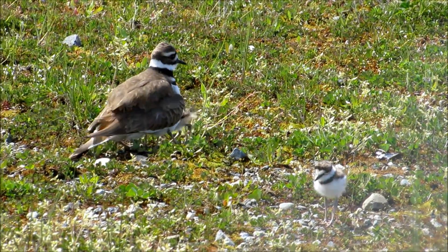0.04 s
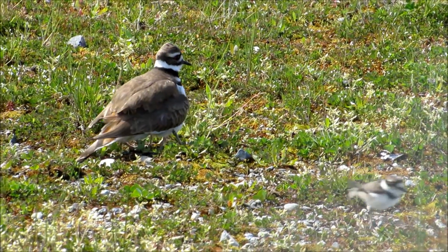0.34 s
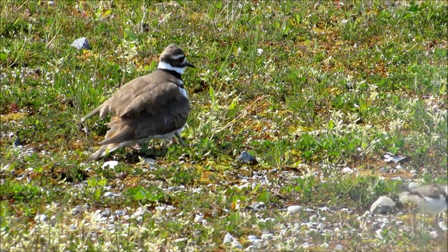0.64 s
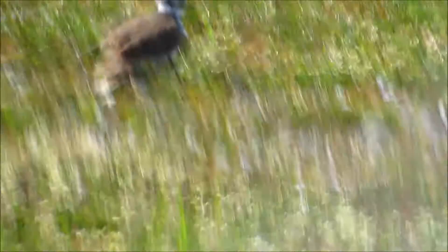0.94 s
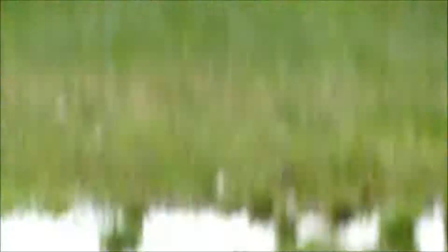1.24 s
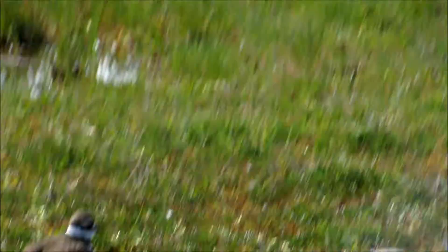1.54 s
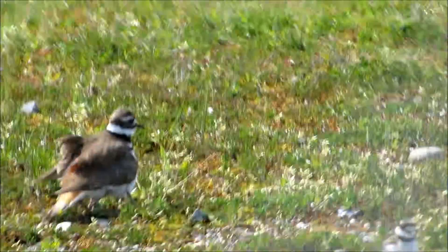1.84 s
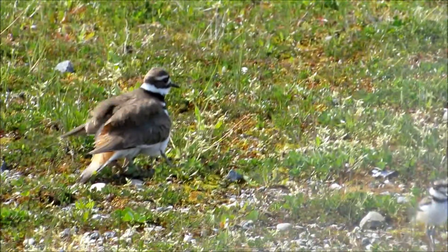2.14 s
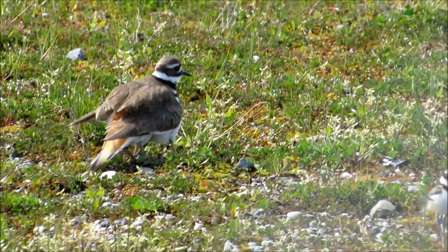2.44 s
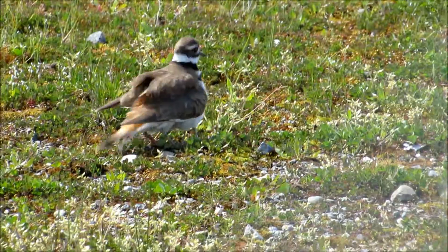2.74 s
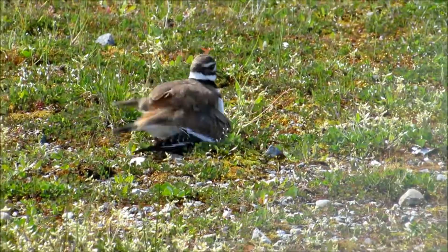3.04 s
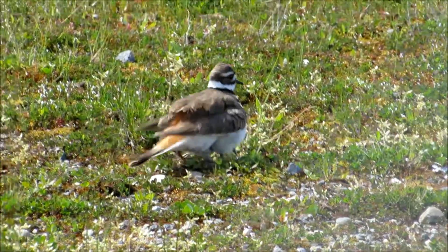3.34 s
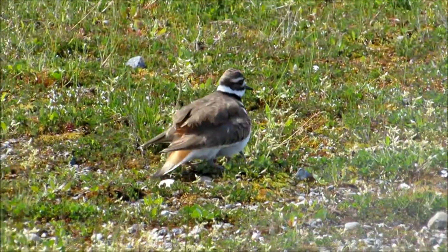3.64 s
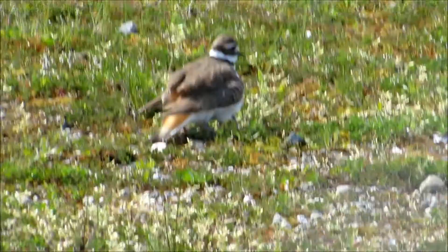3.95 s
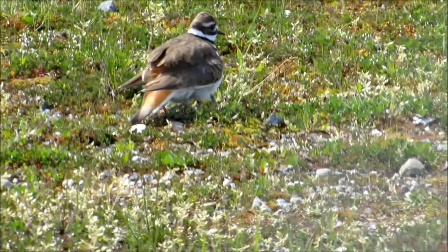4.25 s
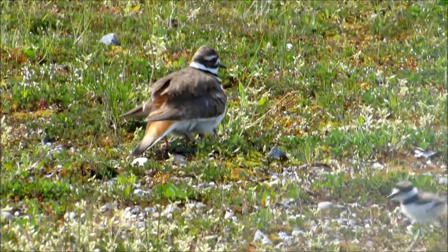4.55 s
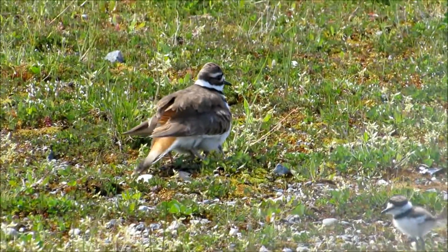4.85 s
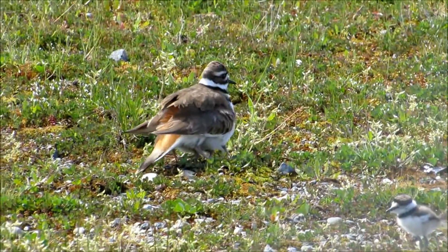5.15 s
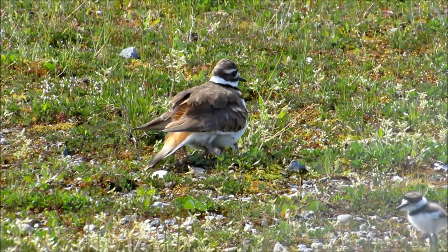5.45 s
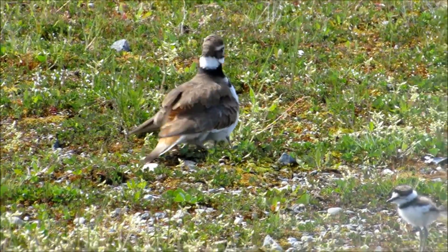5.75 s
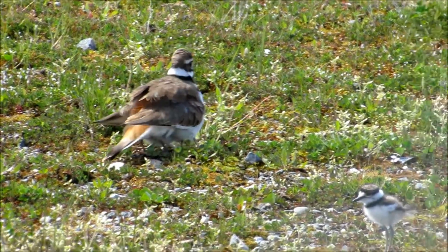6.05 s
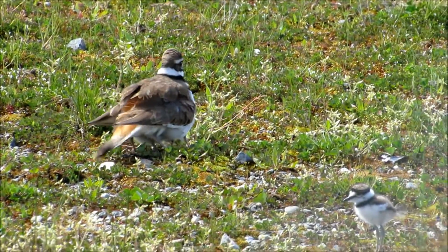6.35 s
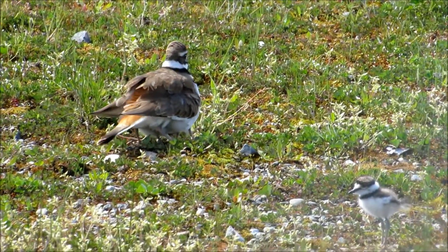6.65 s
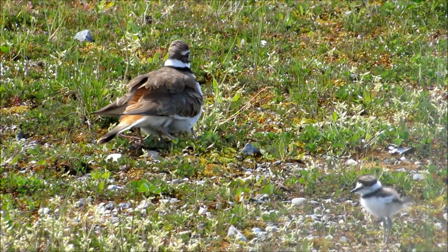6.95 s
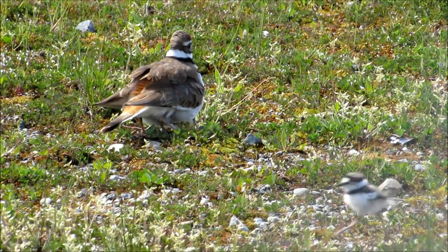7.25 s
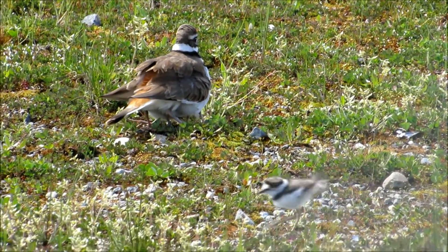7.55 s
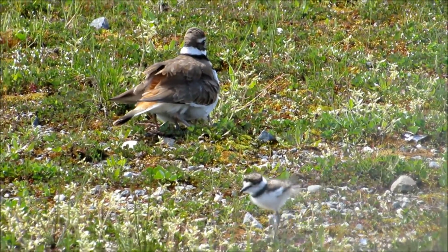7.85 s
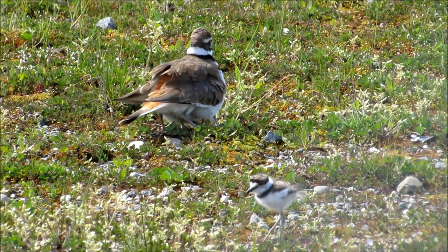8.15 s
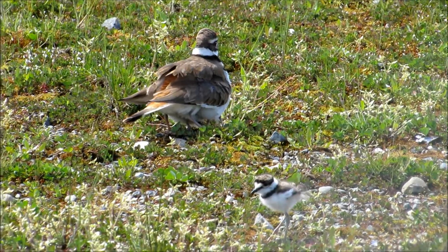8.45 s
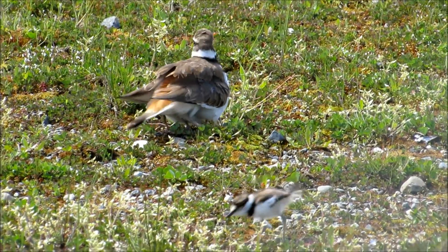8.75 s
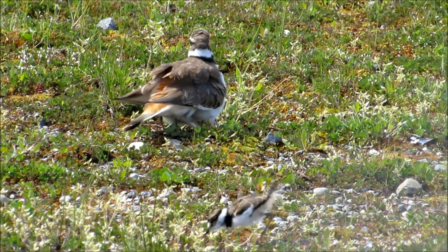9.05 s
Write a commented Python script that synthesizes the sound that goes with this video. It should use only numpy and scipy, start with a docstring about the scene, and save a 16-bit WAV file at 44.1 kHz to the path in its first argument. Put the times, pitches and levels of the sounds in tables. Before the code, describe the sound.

Gusty wind buffets a hand-held microphone in an open field for about nine seconds. Its low, fluttering rumble and irregular thumps are the loudest sound throughout, over a soft outdoor wash. From 0.7 to 1.8 seconds fingers rub the housing, with one soft, briefly ringing knock near 0.9. A bird chick gives six faint, short, high peeps, slightly to the left, at about 3.1, 4.0, 4.7, 5.5, 6.4 and 7.2 seconds. Each starts raspy and falls to a thin held whistle; the middle two are clearest. A very soft hiss swells to a peak near 4.7 seconds and fades by 6. The wind strengthens from about 4 seconds, with harder thumps, small pops and a sharp snap near 8.8. Barely audible distant birds chirp around 0.4, 2.4, 6 and 8 seconds.

```python
"""Killdeer chick in gusty wind.

A chick whistles raspy, falling peeps on open gravelly grass; the ground scatters a thin tail.
Gusts buffet the two ports of a hand-held microphone: turbulence rumbles, vortices thump and pop.
Early on, fingers rub the housing and knock its modes into ringing. Other small birds call far off
over an outdoor wash, and a soft hiss swells and fades."""
import sys
import numpy as np
from scipy import signal
from scipy.fft import rfft, irfft, next_fast_len
from scipy.io import wavfile

SR = 44100
rng = np.random.default_rng(int(sys.argv[2]) if len(sys.argv) > 2 else 0)


def file_out(sig):
    """Save sig as 16-bit WAV at sys.argv[1]."""
    # one column per channel
    cols = np.atleast_2d(sig).T
    # limit, then scale
    lim = np.clip(cols, -1, 1)
    pcm = np.round(lim * 32767).astype(np.int16)
    wavfile.write(sys.argv[1], SR, pcm)


N = 410571
TIME = np.arange(N) / SR


def from_db(db):
    """Decibels to gain."""
    return 10 ** (np.asarray(db) / 20)


def unit_rms(x):
    """Scale to rms 1."""
    return x / np.sqrt(np.mean(x ** 2) + 1e-20)


def curve(rows):
    """Interpolate (t/s, value) rows at every sample."""
    return np.interp(TIME, *np.transpose(rows))


def panned(pan_db):
    """Stereo gains, left over right by pan_db."""
    return from_db(np.array([[pan_db], [-pan_db]]) / 2)


def drift(rate_hz):
    """Random wander below rate_hz, rms 1."""
    hop, settle = 20, 2000
    pole = np.exp(-2 * np.pi * rate_hz * hop / SR)
    white = rng.standard_normal(N // hop + settle + 2)
    slow = signal.lfilter([1], [1, -2 * pole, pole * pole], white)[settle:]
    return np.interp(np.arange(N) / hop, np.arange(len(slow)), unit_rms(slow))


def noise(spectrum, tilt_db_oct=0, size=N):
    """Two independent shaped noises, rms 1, falling 24 dB/oct beyond the spectrum's ends."""
    hz, level_db = np.transpose(spectrum)
    padded = next_fast_len(size)
    octave = np.log2(np.maximum(np.fft.rfftfreq(padded, 1 / SR), 1))
    inside = np.clip(octave, np.log2(hz[0]), np.log2(hz[-1]))
    shape_db = np.interp(octave, np.log2(hz), level_db) + tilt_db_oct * inside - 24 * abs(octave - inside)
    white = rfft(rng.standard_normal((2, padded)))
    return unit_rms(irfft(white * from_db(shape_db), padded)[:, :size])


def low_pass(x, hz, order=2):
    """Butterworth low-pass."""
    return signal.sosfilt(signal.butter(order, hz, fs=SR, output="sos"), x)


def add(out, start_s, sound):
    """Mix a sound in from start_s."""
    at = max(round(start_s * SR), 0)
    out[..., at:at + sound.shape[-1]] += sound[..., :max(N - at, 0)]


# wash spectrum: f/Hz, relative density/dB
AIR_SPECTRUM = [(100, 6.5), (400, -1.5), (800, -3.5), (1400, -5), (2100, -17.5), (3450, -24.5), (4000, -33),
                (7000, -37.5)]
# wash swell: t/s, gain/dB
AIR_GAIN = [(0, -2), (1.4, 1), (3.5, 1.5), (5.5, 0.5), (9.3, -1.5)]


def outdoor_air(base_db=-66, correlation=0.29, pan_db=6):
    """A far wash, mostly from the left, slowly swells and fades."""
    mid, side = from_db(base_db) * noise(AIR_SPECTRUM)
    wash = np.sqrt(1 + correlation) * mid + np.sqrt(1 - correlation) * np.array([side, -side])
    return wash * panned(pan_db) * from_db(curve(AIR_GAIN))


# microphone noise floor: f/Hz, relative density/dB
FLOOR_SPECTRUM = [(1000, -33), (4500, 8.5), (7000, 0.5), (10000, 5), (12000, -5.5), (14000, -18)]


def self_noise(level_db=-92):
    """The microphone's own steady hiss."""
    return from_db(level_db) * noise(FLOOR_SPECTRUM)


# wind strength at the ports: t/s, level/dB
GUST_LEVEL = [(0, -42.5), (0.42, -38), (1.17, -42.5), (1.8, -34.5), (2.25, -39), (2.75, -40), (3.4, -40.5),
              (3.95, -34.5), (5.25, -35.5), (5.45, -33.5), (5.65, -34.5), (6.3, -34), (7.05, -38),
              (7.4, -37), (7.85, -36), (8.25, -36), (8.85, -35), (9.3, -37)]
# brief drops in the wind: t/s, depth/dB
GUST_LULLS = [(.14, 3), (1.0, 1), (2.72, 12.5), (6, 9.5), (7.0, 3.5), (7.63, 7), (8.02, 8)]


def gusts(lull_sigma_s=0.022):
    """Wind strength in dB: a gust every second or two, cut by short lulls."""
    lulls_db = sum(depth_db * np.exp(-.5 * ((TIME - s) / lull_sigma_s) ** 2) for s, depth_db in GUST_LULLS)
    return curve(GUST_LEVEL) - lulls_db


def random_eddies(gust_db, per_s=14, over_gust_db=7, scatter_db=4.5,
                  centre_hz=346, oct_per_db=-0.0239, scatter_oct=0.23):
    """Uneven eddies, harder and deeper in stronger gusts. Rows: t/s, level/dB, f/Hz."""
    late, strength, pitch = rng.uniform(-1, 1, (300, 3)).T
    s = (np.arange(len(late)) + 1 + late) / per_s
    local_db = np.interp(s, TIME, gust_db)
    peak_db = local_db + over_gust_db + scatter_db * strength
    hz = centre_hz * 2 ** (oct_per_db * (local_db - gust_db.mean()) + scatter_oct * pitch)
    return np.transpose([s, peak_db, hz])[s < TIME[-1]]


# wind rumble: f/Hz, relative density/dB
TURBULENCE_SPECTRUM = [(25, -3.5), (50, 2), (120, 3), (190, 3), (330, -1.5), (520, -9), (750, -18),
                       (1000, -27), (1400, -38), (1750, -46.5), (2300, -57.5), (3000, -63.5)]


def turbulence(gust_db, eddies, gain_db=-1.8, surge_share=0.35, rise_s=0.0035, fall_s=0.0085):
    """Rumble in each port: as the flow surges, small fast eddies grow most; each size sputters alone."""
    mean_db = gust_db.mean()
    flutter_db = 4 * np.minimum(drift(rate_hz=55), 1.5)
    lumps_db = 1.44 * np.minimum(drift(rate_hz=11), 1.5)
    flow_db = gust_db - mean_db + flutter_db + lumps_db
    for s, peak_db, _ in eddies:
        near = slice(max(round((s - .04) * SR), 0), round((s + .04) * SR))
        t = TIME[near] - s
        surge = np.exp(-.5 * (t / np.where(t < 0, rise_s, fall_s)) ** 2)
        crest_db = gust_db[near] + surge_share * (peak_db - gust_db[near])
        flow_db[near] += surge * (crest_db - mean_db - flow_db[near])
    rest, out = noise(TURBULENCE_SPECTRUM), 0
    for k, edge_hz in enumerate([90, 220, 500, 1100, 8000]):
        band = low_pass(low_pass(rest, edge_hz)[:, ::-1], edge_hz)[:, ::-1]  # zero phase
        rest = rest - band
        sensitivity = 0.4167 + 0.345 * k
        sputter_db = 3 * np.minimum(drift(rate_hz=70), 1.5)
        out = out + band * from_db(sensitivity * flow_db + sputter_db)
    return from_db(mean_db + gain_db) * out


def vortex(t, hz):
    """One pull and one push of height 1, with its energy around hz."""
    x = np.pi * hz * t
    swing = x / (1 + x ** 2) ** 3
    return swing / swing.max()


def buffets(eddies, gain_db=-4, flank_db=-7, spacing_s=0.003602):
    """A vortex passes the windward port, with a weaker one just ahead and another behind."""
    out, t = np.zeros(N), np.arange(-SR // 50, SR // 50) / SR
    for (s, peak_db, hz), draws in zip(eddies, rng.uniform(-0.933, 1, (len(eddies), 3, 3))):
        for place, (polarity, late, pitch) in zip((-1, 0, 1), draws):
            delay_s = place * spacing_s * (1 + late / 2)
            swing = np.sign(polarity) * vortex(t - delay_s, hz * 10 ** (0.15 * pitch * place))
            add(out, s + t[0], from_db(peak_db + gain_db + flank_db * abs(place)) * swing)
    return out


# hardest eddies at the port: t/s, level/dB, centre f/Hz
HARD_EDDIES = [(0.084, -23.5, 225), (.271, -28, 280), (0.334, -31, 364), (0.379, -22, 240),
               (.405, -28.5, 333), (.454, -27, 265), (0.506, -25, 340), (.54, -26.5, 308),
               (0.691, -23, 260), (.885, -25.5, 380), (1.058, -24, 317), (1.25, -22.5, 210),
               (1.533, -22.5, 258), (1.555, -31, 278), (1.601, -25, 360), (1.699, -18, 380),
               (1.79, -24.5, 304), (1.963, -22, 363), (1.994, -24.5, 337), (2.34, -22, 298),
               (2.448, -18.5, 410), (2.463, -17.5, 432), (2.531, -25, 408), (2.587, -22, 368),
               (2.645, -18.5, 262), (2.807, -20.5, 348), (2.854, -27.5, 289), (3.094, -32, 204),
               (3.116, -22.5, 293), (3.266, -37, 306), (3.58, -29, 234), (3.846, -22, 400),
               (3.931, -27, 340), (4.008, -18.5, 288), (4.126, -20.5, 304), (4.178, -26.5, 390),
               (4.306, -22.5, 310), (4.397, -26.5, 324), (4.427, -31, 338), (4.515, -22.5, 396),
               (4.592, -18.5, 464), (4.798, -20, 427), (4.818, -22, 520), (4.859, -22, 250),
               (4.888, -23.5, 261), (5.003, -19, 434), (5.032, -26, 320), (5.051, -13, 250),
               (5.363, -19.5, 232), (5.392, -22, 369), (5.422, -17, 310), (5.453, -13.5, 322),
               (5.478, -17, 286), (5.593, -18.5, 353), (5.776, -18.5, 443), (5.796, -16, 280),
               (5.812, -19.5, 258), (5.861, -22.5, 368), (5.959, -22.5, 223), (6.053, -11, 324),
               (6.117, -23, 241), (6.267, -18.5, 490), (6.3, -18, 490), (6.5, -16, 390),
               (6.543, -22.5, 313), (6.654, -21.5, 406), (6.786, -20, 420), (6.803, -16.5, 388),
               (6.864, -23, 417), (7.144, -21.5, 400), (7.197, -21, 402), (7.306, -20, 359),
               (7.347, -23.5, 400), (7.419, -24, 350), (7.435, -14, 375), (7.589, -22, 370),
               (7.68, -19, 323), (7.912, -19, 295), (7.954, -23, 308), (8.095, -16.5, 475),
               (8.124, -23, 324), (8.16, -15, 342), (8.189, -21.5, 438), (8.243, -21.5, 338),
               (8.277, -16.5, 337), (8.334, -18.5, 505), (8.408, -18, 330), (8.519, -19, 350),
               (8.539, -21, 440), (8.582, -16, 500), (8.591, -22.5, 527), (8.725, -23.5, 410),
               (8.793, -20, 466), (8.836, -13, 312), (8.888, -23.5, 375), (9.099, -28, 445)]


def wind(lee_db=-8, cross_gain=0.73, cross_hz=1300):
    """Each channel subtracts the dulled other port, so wind comes out in opposite phase."""
    gust_db = gusts()
    eddies = np.vstack([random_eddies(gust_db), HARD_EDDIES])
    ports = turbulence(gust_db, eddies) * from_db([[0], [lee_db]])
    ports[0] += buffets(eddies) + pops()
    return ports - cross_gain * low_pass(ports[::-1], cross_hz, order=1)


# distant calls: t/s, length/s, first f/Hz, last f/Hz, level/dB
FAR_CALLS = [(0.385, 0.057, 8000, 6970, -91), (2.365, 0.12, 3520, 3540, -86), (5.98, 0.12, 3600, 3540, -88),
             (7.722, .04, 4130, 4030, -93), (8.085, 0.014, 3180, 3830, -88),
             (8.102, 0.012, 3200, 3750, -84), (8.122, .012, 3700, 4000, -91)]


def far_birds(shimmer_db=5, waver=0.0089, pan_db=5):
    """Thin gliding whistles that waver in pitch and level."""
    out = np.zeros(N)
    for s, length_s, first_hz, last_hz, level_db in FAR_CALLS:
        progress = np.linspace(0, 1, round(length_s * SR))
        hz = last_hz + (first_hz - last_hz) * (1 - progress) ** 1.1
        hz *= 1 + waver * drift(rate_hz=120)[:len(hz)]
        whistle = np.sqrt(2) * np.sin(2 * np.pi * np.cumsum(hz) / SR)
        add(out, s, from_db(level_db) * np.sin(np.pi * progress) * whistle)
    return out * from_db(shimmer_db * drift(rate_hz=50)) * panned(pan_db)


def ground_scatter(x, tail_db, t60_s, echo_s=0.051, echo_db=-24):
    """The ground adds one faint echo and a thin tail."""
    t = TIME[:SR // 2]
    response = rng.standard_normal((2, len(t))) * from_db(-60 * t / t60_s)
    response *= from_db(tail_db) / np.sqrt(np.sum(response[0] ** 2))
    response[:, round(echo_s * SR)] += from_db(echo_db)
    return x + signal.fftconvolve(x, response, axes=1)[:, :N]


# finger ticks and slides, and one sharp wind snap at 8.84 s:
# t/s, level/dB, rise/s, decay/s, tilt/(dB/oct), L-R/dB
RUBS_AND_SNAP = [(.724, -64, .0012, 0.0017, 5, -10), (.806, -53.5, 0.0068, 0.043, -7, -3.5),
                 (.825, -80, .012, .04, 7, -3), (0.91, -49.5, 0.00026, 0.0018, -0.5, -8),
                 (.934, -54, .002, 0.013, -3.5, -7), (.944, -47, 0.008, 0.0032, -1, -3),
                 (0.959, -55.5, 0.0075, 0.03, -2.5, -4.5), (1.016, -63, 0.0011, 0.038, 7, 1),
                 (1.07, -66, 0.022, 0.073, -3.5, 4), (1.283, -78, .006, .009, 1, 0),
                 (1.494, -73, 0.035, 0.04, 10, 4), (1.528, -71.5, 0.025, 0.023, 12, 6),
                 (1.655, -58, 0.057, 0.041, -5, 6), (1.813, -54.5, 0.003, 0.009, -5.5, 3),
                 (3.827, -72.5, 0.0044, 0.026, 0, -3), (8.125, -74, .02, .025, -3, 0),
                 (8.8378, -44, .0004, .0007, -7.5, 5), (9.264, -65, 0.017, .02, -4, -4)]
# skin on plastic, also used for the snap: f/Hz, relative density/dB
BURST_SPECTRUM = [(500, 6.5), (1200, 5.5), (3000, -0.5), (6000, -1.5), (11000, -9), (14000, -20)]


def rubs_and_snap(grain_db=1):
    """Grainy noise bursts: fingers stick and slip on the housing, and one small eddy snaps."""
    out, t = np.zeros((2, N)), np.arange(-SR // 5, SR // 4) / SR
    for s, peak_db, rise_s, decay_s, tilt_db_oct, pan_db in RUBS_AND_SNAP:
        swell = np.exp(np.minimum(t / rise_s, -t / decay_s))
        burst = noise(BURST_SPECTRUM, tilt_db_oct, size=len(t))
        add(out, s + t[0], from_db(peak_db) * swell * panned(pan_db) * burst)
    return out * from_db(grain_db * drift(rate_hz=300))


# housing modes: f/Hz, relative level/dB, t60/s
HOUSING_MODES = [(515, -11, .075), (800, 0, .04), (1395, -13, .025), (1610, -10, .03), (1960, -16, .03),
                 (2710, -19, .024), (3430, -18, .035), (3710, -17, .033), (4480, -28, .02),
                 (5070, -29, .02), (5820, -25, .02)]


def knock(at_s=.9425, level_db=-34, pan_db=-4, scrape_s=.003, lag_cycles=2.2, grit_db=3, jitter_rad=0.43):
    """A finger scrapes up to a soft blow: high modes chatter first, low ones swell last and ring on."""
    out, t = np.zeros(N), np.arange(-SR // 25, SR // 5) / SR
    main_hz = HOUSING_MODES[1][0]
    for hz, mode_db, t60_s in HOUSING_MODES:
        since_s = t - lag_cycles / hz
        spread = np.sqrt(hz / main_hz)
        swell = np.exp(np.minimum(since_s, 0) / (scrape_s * spread))
        grit, slip = drift(rate_hz=600)[:2 * len(t)].reshape(2, -1)
        ring_db = level_db + mode_db - 60 * np.maximum(since_s, 0) / t60_s + grit_db * np.minimum(grit, 1)
        ring = np.sin(2 * np.pi * hz * t + jitter_rad * spread * slip)
        add(out, at_s + t[0], swell * from_db(ring_db) * ring)
    return out * panned(pan_db)


# pops at the port: t/s, level/dB
PORT_POPS = [(1.792, -37), (2.463, -41), (4.592, -36), (4.818, -43), (5.002, -35), (5.422, -38),
             (5.453, -43), (5.482, -37.5), (5.596, -40), (5.776, -45), (5.794, -47), (5.813, -37.5),
             (6.055, -38), (6.266, -41), (6.302, -41), (6.309, -36), (6.783, -43.5), (6.807, -34),
             (7.196, -49), (7.587, -46), (8.094, -46), (8.333, -41), (8.409, -39), (8.519, -45),
             (8.539, -47), (8.582, -30), (8.592, -48), (8.724, -46), (8.793, -47), (8.837, -30)]


def pops(gain_db=3, centre_hz=850, dull_hz=1650, gap_s=0.0016, loss_db=6, count=3):
    """Flow tears off a port's edge: a tiny fast vortex, then weaker ones, all dulled by the port."""
    out, t = np.zeros(N), np.arange(-SR // 100, SR // 100) / SR
    for (s, peak_db), draws in zip(PORT_POPS, rng.uniform(-0.91, 1, (len(PORT_POPS), count, 2))):
        for k, (polarity, late) in enumerate(draws):
            delay_s = k * gap_s * (1 + late / 2)
            swing = np.sign(polarity) * vortex(t, centre_hz)
            add(out, s + t[0] + delay_s, from_db(peak_db - loss_db * k) * swing)
    return from_db(gain_db) * low_pass(out, dull_hz, order=3)


# hiss envelope: t/s, level/dB
HISS_SWELL = [(0, -104), (2.8, -100), (3.3, -88.5), (4.05, -83.5), (4.35, -78.5), (4.65, -74.5),
              (5.0, -76.5), (5.5, -80.5), (6.1, -88.5), (9.3, -100)]
# hiss spectrum: f/Hz, relative density/dB
HISS_SPECTRUM = [(1300, 1.5), (2200, 6), (3300, 6.5), (4000, 2.5), (5000, 2.5), (7000, -1.5), (10000, -6),
                 (12000, -12), (14000, -26)]


def swelling_hiss(gain_db=-1):
    """A soft high hiss rises to a peak midway and fades."""
    return from_db(curve(HISS_SWELL) + gain_db) * noise(HISS_SPECTRUM)


# peeps: t/s, length/s, crest f/Hz, held f/Hz, last f/Hz, crest level/dB, held level/dB,
# voice break length/s, L-R/dB, overtone tilt/(dB/oct)
CHICK_PEEPS = [(3.054, .122, 4620, 4030, 4220, -78.5, -77, .004, 9, 1),
               (4.014, .108, 4710, 4310, 4430, -74, -78, .012, 3, 5),
               (4.711, .112, 4900, 4350, 4480, -64.5, -76, .028, 2, 1),
               (5.511, .119, 4940, 4170, 4060, -64.5, -73, .02, 7, -1),
               (6.362, .131, 4800, 4210, 4430, -69.5, -75.5, .008, 7, -2),
               (7.186, .126, 4740, 4160, 4330, -73, -76, .006, 11, -2)]
# partials around the whistle: pitch ratio, level re held note/dB, boost at crest/dB
CHICK_PARTIALS = [(.5, -9, 0), (1.25, -40, 21), (1.5, -24, 8), (2, -27, 7), (2.5, -43, 14), (3, -37, 3)]


def chick(crest_s=.011, sink_s=0.023, accent_s=.024, fade_s=0.019, break_db=7,
          flick=0.12, waver=0.0033, rasp=0.25, shimmer_db=1, flicker_db=4):
    """Each peep flicks up to a loud raspy crest, breaks as it sinks to a held note and bends at the end."""
    out = np.zeros((2, N))
    wander, shimmer, grit = drift(rate_hz=150), drift(rate_hz=60), drift(rate_hz=700)
    flickers = [drift(rate_hz=60) for _ in CHICK_PARTIALS]
    for s, length_s, crest_hz, held_hz, last_hz, crest_db, held_db, break_s, pan_db, tilt in CHICK_PEEPS:
        at = slice(round(s * SR), round((s + length_s) * SR))
        t = TIME[at] - TIME[at][0]
        sinking = np.exp(-(np.maximum(t - crest_s, 0) / sink_s) ** 1.4)
        hz = held_hz + (crest_hz - held_hz) * sinking + (last_hz - held_hz) * (t / length_s) ** 5
        hz *= 1 - flick * np.maximum(1 - t / crest_s, 0) ** 2
        hz *= 1 + waver * wander[at]
        phase = 2 * np.pi * np.cumsum(hz) / SR
        accent = np.exp(-(t / accent_s) ** 8)
        broken = np.exp(-(t / (accent_s + break_s)) ** 8) - accent
        # the throat favours the main whistle
        voice = np.sin(phase) * from_db((crest_db - held_db) * accent - break_db * broken)
        voice *= 1 + rasp * (accent + broken) * grit[at]
        for (ratio, level_db, boost_db), flicker in zip(CHICK_PARTIALS, flickers):
            partial_db = level_db + tilt * np.log2(max(ratio, 1)) + boost_db * accent
            voice += from_db(partial_db + flicker_db * np.minimum(flicker[at], 1)) * np.sin(ratio * phase)
        ramp = np.clip(np.minimum(t / crest_s, (length_s - t) / fade_s), 0, 1)
        envelope = np.sin(np.pi / 2 * ramp) ** 2 * from_db(held_db + shimmer_db * shimmer[at])
        out[:, at] += np.sqrt(2) * voice * envelope * panned(pan_db)
    return out


def scene():
    """Birds out in the field, handling and wind at the microphone; distance adds scatter."""
    birds = ground_scatter(chick(), tail_db=-17, t60_s=.6)
    birds += ground_scatter(far_birds(), tail_db=-5, t60_s=.5)
    return birds + rubs_and_snap() + knock() + outdoor_air() + swelling_hiss() + self_noise() + wind()


# dips in the microphone's response: f/Hz, Q
MIC_NOTCHES = [(3940, 22), (7950, 35)]


def record(dry, cutoff_hz=14500):
    """The microphone has two narrow dips and a steep top cut."""
    for hz, q in MIC_NOTCHES:
        dry = signal.lfilter(*signal.iirnotch(hz, q, fs=SR), dry)
    return signal.sosfilt(signal.ellip(10, .1, 80, cutoff_hz, fs=SR, output="sos"), dry)


dry = scene()
out = record(dry)
file_out(out)
```